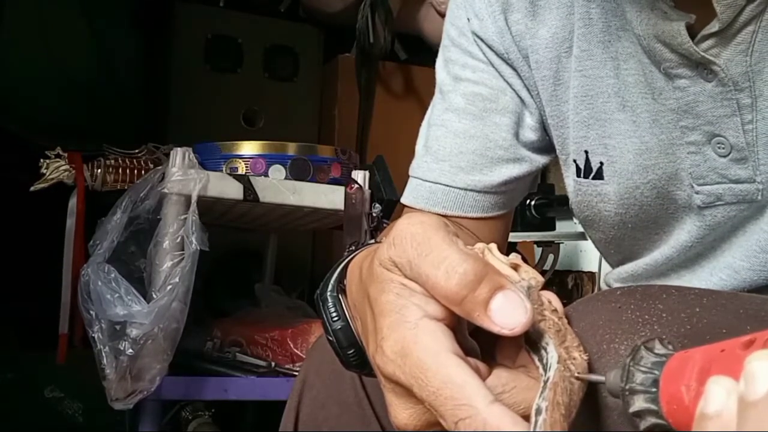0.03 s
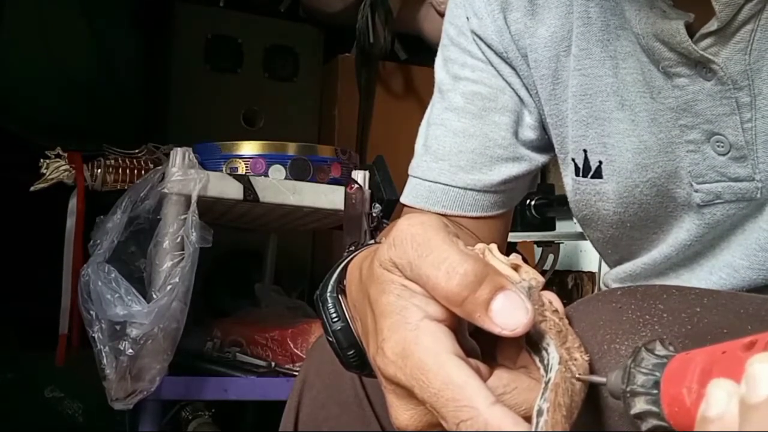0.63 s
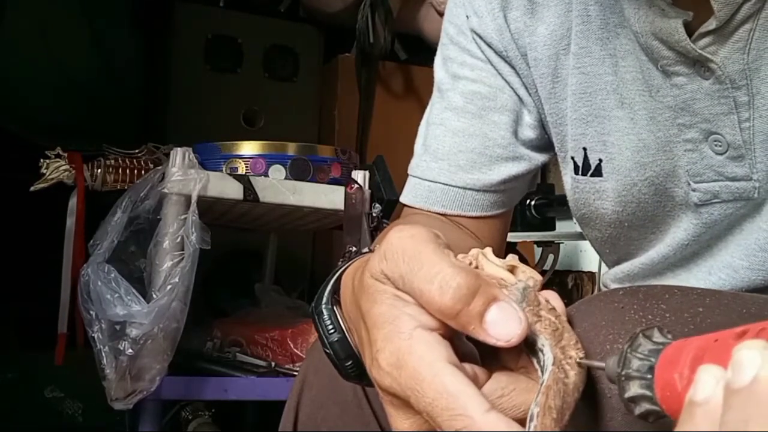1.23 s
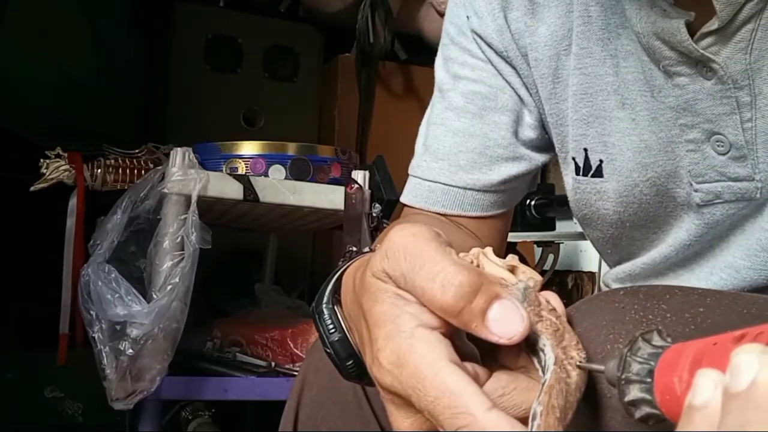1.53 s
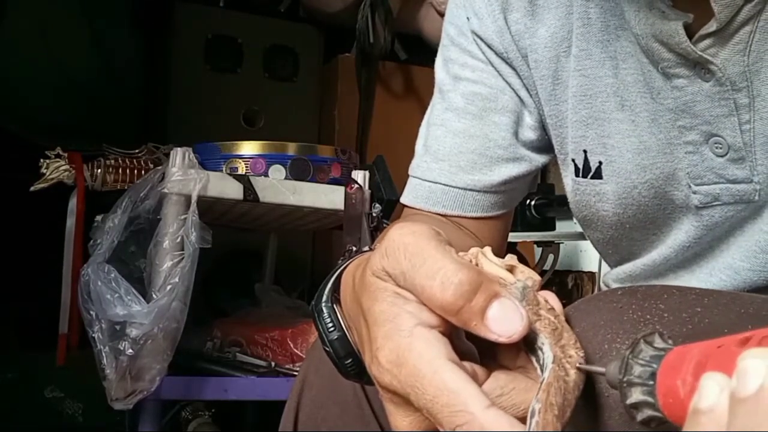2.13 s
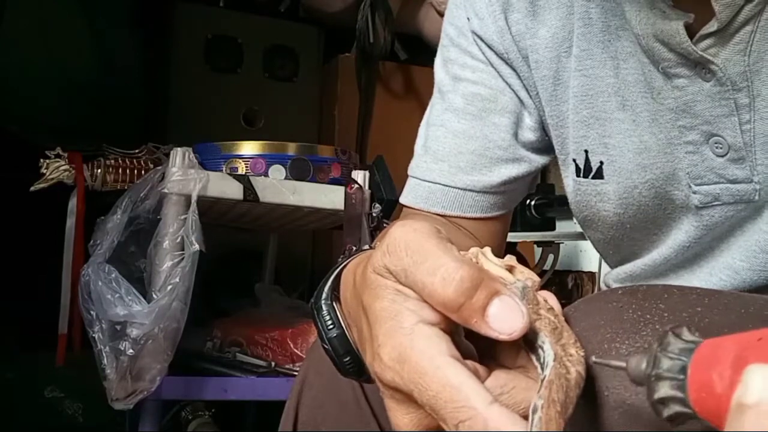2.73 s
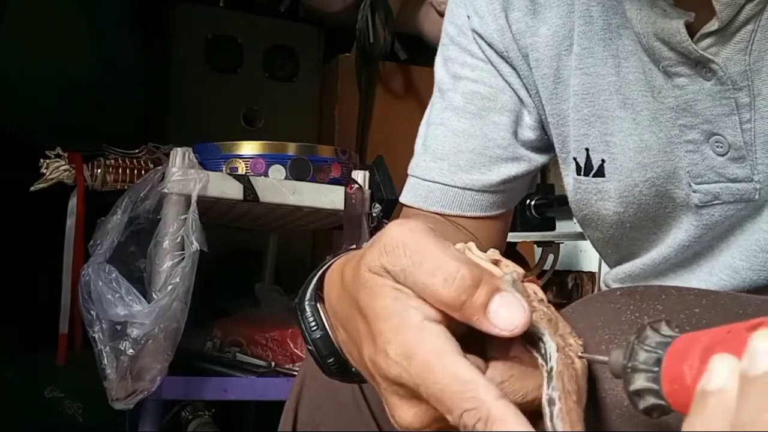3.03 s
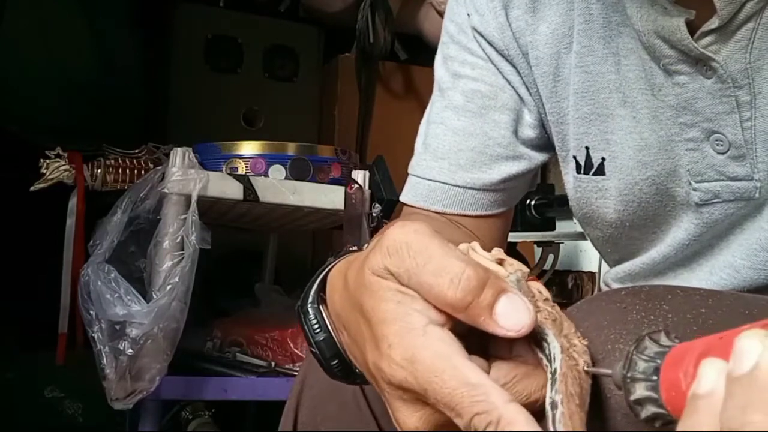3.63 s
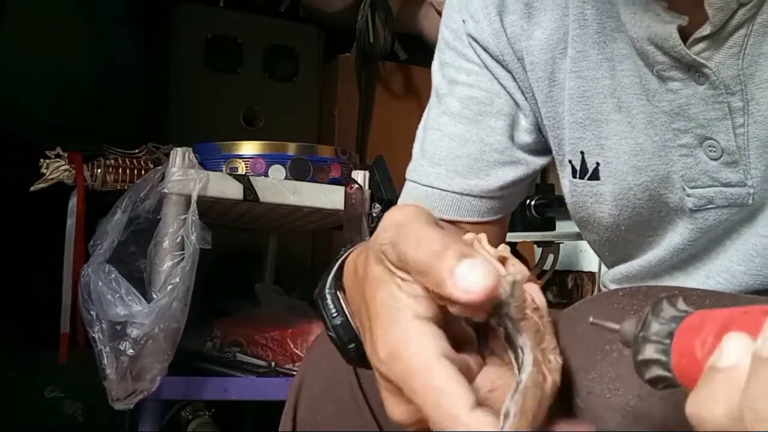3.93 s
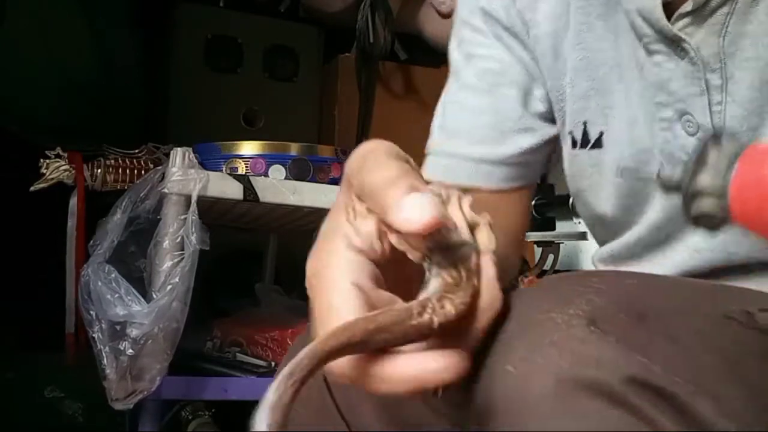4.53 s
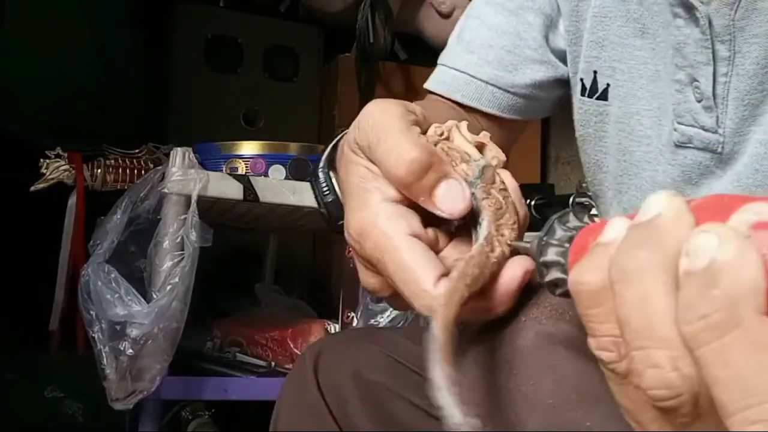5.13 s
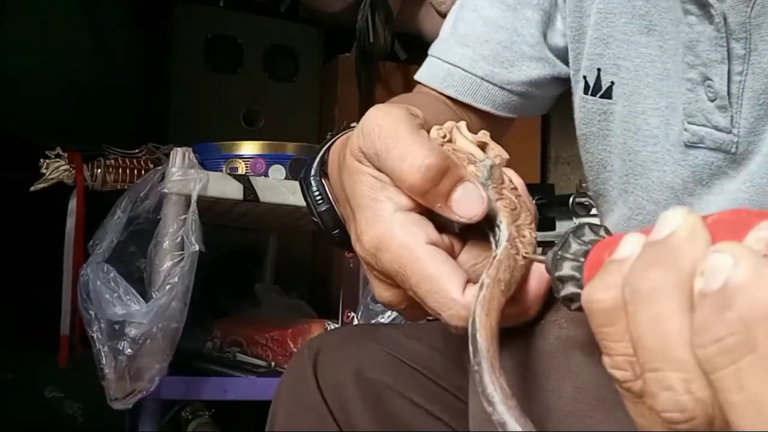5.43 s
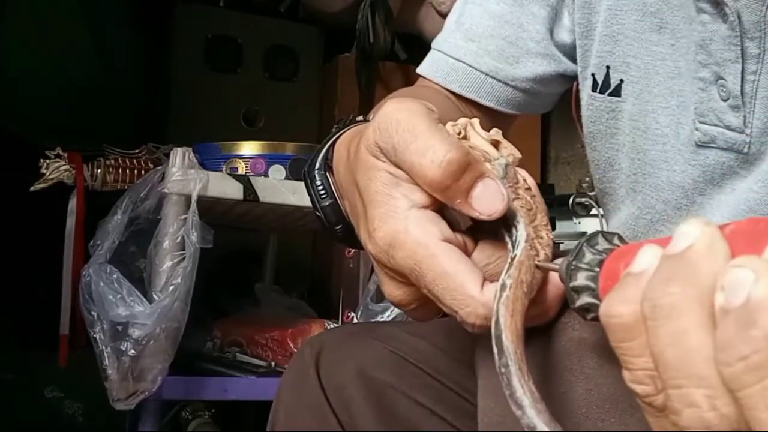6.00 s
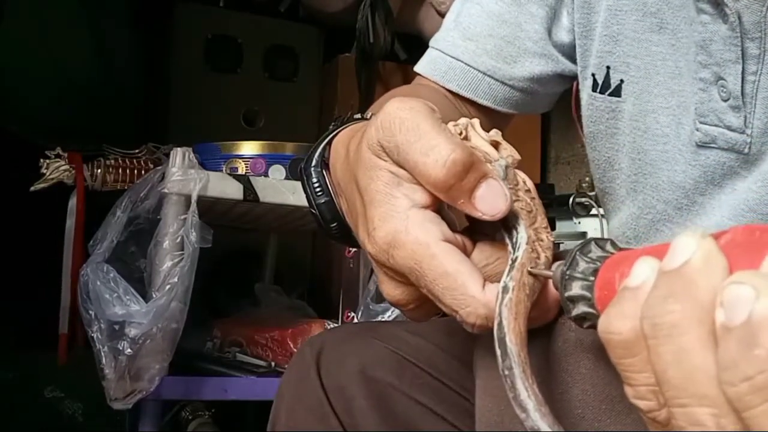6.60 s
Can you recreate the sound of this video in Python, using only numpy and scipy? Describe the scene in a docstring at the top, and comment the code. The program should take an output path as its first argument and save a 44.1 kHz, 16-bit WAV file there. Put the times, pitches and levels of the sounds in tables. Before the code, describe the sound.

A small electric rotary tool runs throughout, close by in a small room and louder on the left. It makes a high, slightly wavering whine with fan hiss and a fine electrical buzz. From the start to about 0.7 seconds its tip rasps into wood, with a few tiny squeaks. Further cuts come at about 1.2 to 1.6 and 1.9 to 2.4 seconds, each pulling the pitch down slightly, the latter with a faint growl. The tool then runs more freely and creeps up in pitch, with a high tone swelling near 3.4 seconds and a light scrape around 4. From 5.5 seconds a longer cut rasps on to the end, near 7 seconds, while the whine sinks and finishes with a brief squeak. Faint, dull bumps of hands on the wood occur in the first second and around 2.7, 4.7 and 5.7 seconds.

```python
"""In a small room, a little mains-powered rotary tool carves wood close by, louder at the left ear.
Its shaft turns about 320 times a second and whines on multiples of that speed; its fan hisses
through the vents. The speed control fires 100 times a second, which buzzes in the housing.
When the burr (the cutting tip) bites, the speed sags, the wood rasps and other multiples come forward.
Now and then the hands bump the wood, or a single tone swells into a squeak or a growl."""
import sys
import numpy as np
from scipy import signal
from scipy.fft import rfft, irfft
from scipy.io import wavfile
from scipy.ndimage import uniform_filter1d

SR = 44100
rng = np.random.default_rng(int(sys.argv[2]) if len(sys.argv) > 2 else 0)


def master_out(mix):
    """Clip the mix to full scale and print it as 16-bit PCM to the path in sys.argv[1]."""
    frames = np.transpose(np.atleast_2d(mix))
    ceiling = np.clip(frames, -1, 1)
    pcm = np.round(ceiling * 32767).astype(np.int16)
    wavfile.write(sys.argv[1], SR, pcm)


N = 302526
TIME = np.arange(N) / SR
FREQUENCIES = np.fft.rfftfreq(N, 1 / SR)
FIRING_HZ = 100.05  # how often the speed control lets current through
LEFT_DELAY_S = .00084  # the left ear hears the tool this much later
START_PHASES = rng.random((64, 8)) - .5  # where in its cycle each tone begins

# How fast the shaft turns: (time [s], speed [Hz])
SHAFT_SPEED = [(0.0, 314.7), (0.26, 316.0), (0.79, 317.3), (0.99, 321.5), (1.31, 323.1), (1.57, 317.2),
               (1.89, 319.0), (2.09, 321.0), (2.37, 313.7), (2.58, 318.4), (2.96, 322.3), (4.18, 327.0),
               (4.9, 328.3), (5.33, 326.8), (5.62, 327.5), (5.97, 320.6), (6.37, 316.4), (6.86, 307.9)]
# The burr presses into the wood: (start [s], end [s], time to bite [s], added load [1 = a full cut])
WOOD_CUTS = [(-0.1, 0.722, .05, 0.85), (1.232, 1.626, 0.065, 0.84), (1.948, 2.385, 0.089, 0.9),
             (2.424, 2.747, .05, .2), (3.675, 4.447, 0.34, .2), (5.45, 7, 0.23, 0.75)]
# Peaks and notches of housing and room: (frequency [Hz], width [Hz], gain [dB])
PEAKS_AND_NOTCHES = [(308.7, 6.6, -28), (617, 51, 8.5), (701.5, 12, 11), (859, 17, -5), (1079, 19, 6),
                     (2586, 79, -12.5), (2670, 140, 3), (4252, 41, 6), (5064, 79, 5), (5240, 50, 1.5),
                     (5895, 150, -8.5), (7450, 56, 8.5)]
# Tones of the whine: (shaft multiple, level running free [dB], level cutting [dB], right ear gain [dB])
WHINE_TONES = [(2, -65, -57, -6), (3, -57, -61, -5), (4, -59, -62, -8), (5, -57, -54, -10),
               (6, -68, -57, -10), (7, -64, -52, -13), (9, -52, -42, -17), (12, -55, -48, -17),
               (13, -51, -44, -17), (14, -56, -50, -13), (15, -62, -51, -12), (17, -56, -47, -16),
               (18, -46, -43, -19), (20, -48, -43, -21), (21, -41, -43, -21), (22, -51, -43, -23),
               (23, -48, -43, -24), (25, -55, -51, -17), (29, -55, -60, -7), (31, -57, -55, -6),
               (32, -60, -55, -3), (46, -56, -49, -11), (47, -53, -55, -9)]
# Strong tones that beam one way: (shaft multiple, level running free [dB], level cutting [dB],
# change once the tool is tilted [dB], right ear gain [dB])
BEAMED_TONES = [(1, -58, -58, -1, -12), (8, -47, -40, 0, -8), (11, -44, -42, -2, -14),
                (16, -40, -39, -5, -17), (19, -35, -37, -2, -25), (24, -44, -42, 2, -26)]
# Side tones, whole steps of the firing rate away from a multiple:
# (shaft multiple, steps, level running free [dB], level cutting [dB], right ear gain [dB])
SIDE_TONES = [(1, 1, -65, -72, -13), (1, 2, -62, -65, -8), (2, 1, -62, -61, -6), (2, 2, -57, -52, -8),
              (3, -1, -61, -55, -5), (3, 1, -58, -63, -6), (3, 2, -64, -72, -2), (4, -1, -70, -65, -8),
              (4, 1, -59, -60, -12), (8, -2, -55, -55, -19), (8, -1, -50, -46, -18), (8, 1, -45, -45, -20),
              (8, 2, -46, -47, -18), (8, 3, -46, -44, -16), (8, 4, -48, -53, -17), (8, 5, -52, -51, -20),
              (16, 1, -49, -53, -19)]
# The buzz fades for a moment: (middle [s], length [s], depth [dB])
BUZZ_DIPS = [(0.2, 0.38, 9), (0.81, 0.71, 6), (1.734, 0.42, 4.5), (4.536, 0.81, 11)]
# How alike noise is at the two ears: (frequency [Hz], likeness [0 to 1])
EAR_LIKENESS = [(60, 1), (300, 0.6), (700, 0.58), (1300, 0.32), (2500, 0.087), (6000, 0.1), (15000, 0.12)]
# Rush of the fan: (frequency [Hz], left level [dB per Hz], right level [dB per Hz])
FAN_SPECTRUM = [(25, -113, -113), (130, -92.5, -94.5), (230, -100, -100.5), (450, -92, -99),
                (880, -87, -83), (2330, -80.5, -93.5), (2980, -71, -81.5), (3260, -70.5, -86),
                (4560, -70.5, -78), (6000, -71, -81.5), (8240, -72.5, -89), (9460, -77, -77),
                (10530, -77, -75.5), (11800, -78.5, -80), (13100, -94, -81)]
# The motor's hollow body: (frequency [Hz], left level [dB per Hz], right level [dB per Hz])
BODY_SPECTRUM = [(200, -110, -112), (320, -85.5, -105), (463, -89.5, -109), (560, -79, -82),
                 (850, -83.5, -92.5), (1070, -78, -92.5), (1370, -79, -90), (1660, -77.5, -97),
                 (2220, -105, -102), (4000, -115, -120)]
# The hollow sound rises and falls: (time [s], gain [dB])
BODY_GAIN = [(0, -1.5), (.5, 0.5), (.85, -2), (1.4, 1.5), (1.75, -1), (2.6, 0.5), (3.6, 0), (4.2, 4.5),
             (4.65, -2.5), (6, -0.5), (6.6, -5)]
# Tone color of air in the vent slots: (frequency [Hz], left gain [dB], right gain [dB])
VENT_SPECTRUM = [(2000, -68, -79), (4400, -31, -65), (5400, -6.5, -39), (6520, 5, -10), (7030, 2.5, -20),
                 (7780, -3, -32), (8210, -13, -40), (9600, -47, -52)]
# Loudness of the vent hiss: (time [s], level [dB])
VENT_LOUDNESS = [(0, -33.5), (.8, -34.5), (1.2, -32), (2.1, -33), (2.75, -36), (2.95, -32), (3.55, -31),
                 (3.8, -34), (4.55, -35.5), (4.9, -31.5), (6, -31), (6.86, -32)]
# Tone color of a thin, very high fizz: (frequency [Hz], left gain [dB], right gain [dB])
FIZZ_SPECTRUM = [(9000, -65, -65), (13000, -35, -40), (13800, -7, -13), (14800, -1.5, -18), (15160, 6, -20),
                 (16000, -14, -12)]
# Loudness of the fizz: (time [s], level [dB])
FIZZ_LOUDNESS = [(0, -40), (2.2, -39.5), (2.6, -36.5), (2.9, -40), (4.5, -40), (4.9, -43.5), (6.86, -42.5)]
# The burr in the wood: (frequency [Hz], left level [dB per Hz], right level [dB per Hz])
RASP_SPECTRUM = [(60, -108, -110), (148, -100, -101), (440, -103, -100), (750, -74.5, -91),
                 (1110, -86, -85), (1350, -76.5, -85), (1720, -80, -86), (2400, -72, -90), (3350, -73, -87),
                 (5400, -79.5, -88), (7470, -72, -81), (8900, -100, -100), (13000, -104, -99)]
# Pitches at which the housing rings: (frequency [Hz], width [Hz], gain [dB])
HOUSING_RINGS = [(1140, 260, -8), (1380, 73, 11), (1630, 200, -6), (2670, 260, 9), (3000, 180, 20.5),
                 (4300, 760, -55)]
# The hands bump the wood: (time [s], level [dB])
HAND_BUMPS = [(0.12, -56), (0.539, -53), (0.8, -52), (1.45, -63), (2.669, -58), (4.67, -56), (5.72, -56),
              (6.82, -76)]
# One tone swells: (middle [s], length [s], shaft multiple, steps of the firing rate, level [dB])
TONE_SWELLS = [(0.285, .045, 17, 0, -40), (0.487, .05, 9, 0, -36), (0.52, .42, 2, 2, -52),
               (0.607, .05, 9, 0, -36), (1.35, .05, 9, 0, -40), (2.17, .35, 2, 2, -51),
               (2.23, .2, 8, 0, -39), (2.3, .2, 2, 1, -52), (3.37, .35, 19, 0, -39), (4.56, .4, 8, 0, -46),
               (6.7, .5, 2, 1, -56), (6.83, .25, 24, 0, -37)]


def gain_of(db):
    """Turns decibels into a number to multiply a sound by."""
    return 10 ** (np.asarray(db) / 20)


def normalize(x):
    """Scales a signal so that its typical size (rms) is 1."""
    return x / np.sqrt(np.mean(x ** 2) + 1e-20)


def over_time(table):
    """Joins the points of a time table with straight lines."""
    times, values = np.transpose(table)
    return np.interp(TIME, times, values)


def over_frequency(table):
    """Joins the points of a frequency table, one curve for each value column."""
    hz, *columns = np.transpose(table)
    return np.array([np.interp(np.log(FREQUENCIES + 1), np.log(hz), column) for column in columns])


def wander(rate_hz):
    """A random wobble of typical size 1 that changes about rate_hz times a second."""
    points = rng.standard_normal(4096)
    return normalize(np.interp(TIME * rate_hz, np.arange(len(points)), points))


def burr_load(idle_load=0.064, release_s=0.067):
    """How hard the burr works: each cut bites, holds and lets go."""
    load = idle_load
    for start, end, bite_s, added_load in WOOD_CUTS:
        biting = (TIME - start) / bite_s
        letting_go = (end - TIME) / release_s + .5
        load = load + added_load * np.clip(np.minimum(biting, letting_go), 0, 1)
    return load


def resonance_db(cycles, stride=128):
    """A tone swells and fades as its pitch slides through the peaks and notches of housing and room."""
    hz = np.gradient(cycles[::stride], TIME[::stride])
    gain_db = sum(db / (1 + (2 * (hz - center) / width) ** 2) for center, width, db in PEAKS_AND_NOTCHES)
    return np.interp(TIME, TIME[::stride], gain_db)


def motor_tone(turns, multiple, level_db, right_db, waver_db, roughness, step=0, scatter=0):
    """One tone, wavering as the hands move. With no scatter, side tones line up at each firing."""
    firings = TIME * FIRING_HZ - .62
    phase = START_PHASES[multiple, 0] + scatter * (step != 0) * START_PHASES[multiple, step]
    cycles = multiple * turns + step * firings + phase
    average_hz = multiple * turns[-1] / TIME[-1] + step * FIRING_HZ
    left = np.cos(2 * np.pi * (cycles - average_hz * LEFT_DELAY_S))
    left *= gain_of(level_db + waver_db * np.tanh(wander(rate_hz=7)))
    right = np.cos(2 * np.pi * cycles)
    right *= gain_of(level_db + right_db + waver_db * np.tanh(wander(rate_hz=5.9)))
    flutter = 1 + roughness * wander(rate_hz=90)
    return np.sqrt(2) * flutter * gain_of(resonance_db(cycles)) * np.array([left, right])


def whine(turns, load, tilt):
    """Rotor, fan blades and burr teeth sing on multiples of the shaft speed, rougher when cutting."""
    bite = np.clip(load, 0, 1)
    roughness = 0.12 + 0.14 * bite
    out = 0
    for multiple, free_db, cutting_db, right_db in WHINE_TONES:
        level_db = free_db + bite * (cutting_db - free_db) + 0.9 - 0.5 * load
        out += motor_tone(turns, multiple, level_db, right_db, waver_db=3, roughness=roughness)
    for multiple, free_db, cutting_db, tilt_db, right_db in BEAMED_TONES:
        level_db = free_db + bite * (cutting_db - free_db) + tilt * tilt_db - 0.18
        out += motor_tone(turns, multiple, level_db, right_db, waver_db=1.3, roughness=roughness)
    return out


def hump(middle_s, length_s):
    """A rounded rise from 0 to 1 and back."""
    return np.cos(np.pi * np.clip((TIME - middle_s) / length_s, -.5, .5))


def buzz(turns, load, buzz_db):
    """The chopped current adds side tones that pulse together; cutting throws them out of step."""
    bite = np.clip(load, 0, 1)
    out = 0
    for multiple, step, free_db, cutting_db, right_db in SIDE_TONES:
        extra_db = buzz_db + 0.36 if multiple > 4 else 0.2
        level_db = free_db + bite * (cutting_db - free_db) + extra_db
        out += motor_tone(turns, multiple, level_db, right_db, waver_db=1.6, roughness=0.12,
                          step=step, scatter=.08 + .9 * bite)
    return out


def current_surges(decay_s):
    """The current jumps at every firing of the speed control and dies away before the next."""
    age_s = (TIME * FIRING_HZ - .6) % 1 / FIRING_HZ
    return age_s / decay_s * np.exp(1 - age_s / decay_s)


def hiss(spectrum, flutter):
    """Noise at both ears: flutter shakes its loudness and the spectrum table sets its tone color."""
    shared, separate = rfft(rng.standard_normal((2, N)) * normalize(flutter))
    likeness = over_frequency(EAR_LIKENESS)[0]
    left = shared * np.exp(-2j * np.pi * FREQUENCIES * LEFT_DELAY_S)
    right = likeness * shared + np.sqrt(1 - likeness ** 2) * separate
    return irfft(np.array([left, right]) * gain_of(over_frequency(spectrum)), N) * np.sqrt(SR / 2)


def fan_air(turns, body_db):
    """Fan, hollow body and vents pulse with the current, the vents also with each turn; fizz on top."""
    surge = current_surges(decay_s=0.00088)
    rush = hiss(FAN_SPECTRUM, 1 + 0.2 * surge + 0.071 * wander(rate_hz=790))
    body = hiss(BODY_SPECTRUM, 1 + 1.34 * surge + 0.072 * wander(rate_hz=190)) * gain_of(body_db)
    vent_flutter_db = 2.7 * surge + 3.1 * np.cos(2 * np.pi * turns) + wander(rate_hz=690)
    vent = normalize(hiss(VENT_SPECTRUM, gain_of(vent_flutter_db)))
    vent *= gain_of(over_time(VENT_LOUDNESS))
    fizz = normalize(hiss(FIZZ_SPECTRUM, gain_of(0.89 * wander(rate_hz=350))))
    fizz *= gain_of(over_time(FIZZ_LOUDNESS))
    return rush + body + vent + fizz


def wood_rasp(turns, load):
    """The burr tears wood fibers once a turn, unevenly, and louder under load."""
    tearing_db = 1.9 * np.cos(2 * np.pi * turns) + 1.5 * wander(rate_hz=300)
    return hiss(RASP_SPECTRUM, gain_of(tearing_db)) * load ** 0.53


def brush_sparks(load, buzz_db, body_db, level_db=-41.5, right_db=-10, steadying_db=5):
    """The motor's brushes spark at each surge and tick in the housing; pressing down steadies them."""
    kicks = current_surges(decay_s=0.00014) * rng.standard_normal(N)
    t = np.arange(2048) / SR
    ringing = 0
    for hz, width, db in HOUSING_RINGS:
        ring = width * np.exp(-np.pi * width * t) * np.cos(2 * np.pi * hz * t)
        ring_db = db + (buzz_db if hz > 2000 else body_db)
        ringing += signal.fftconvolve(kicks, ring)[:N] * gain_of(ring_db)
    left = normalize(ringing) * gain_of(level_db - steadying_db * load)
    right = gain_of(right_db) * np.roll(left, -round(LEFT_DELAY_S * SR))
    return np.array([left, right])


def drifting_echoes(sound, depth_db=1.5):
    """Echoes off hands and lap lift some frequencies and lower others, drifting as the tool moves."""
    slices = signal.stft(sound, nperseg=1024, noverlap=768)[2]
    ripples = uniform_filter1d(rng.standard_normal(slices.shape), size=3, axis=1)  # smooth in frequency
    ripples = uniform_filter1d(ripples, size=70, axis=2)  # smooth in time
    slices *= normalize(gain_of(depth_db * normalize(ripples)))
    return signal.istft(slices, nperseg=1024, noverlap=768)[1][:, :N]


def hand_bumps(band_hz=(78, 180), rise_s=.016, gain_db=-1):
    """The hands knock softly on the wood: short, dull swells of low noise."""
    t = np.arange(SR // 4) / SR
    swell = t / rise_s * np.exp(-t / rise_s)
    dull_filter = signal.butter(4, band_hz, "band", fs=SR, output="sos")
    out = np.zeros(N + SR)
    for start_s, db in HAND_BUMPS:
        knock = signal.sosfilt(dull_filter, rng.standard_normal(len(t))) * swell
        out[round(start_s * SR):][:len(t)] += gain_of(db + gain_db) * knock / abs(knock).max()
    return out[:N]


def squeaks(turns):
    """Single tones swell, mostly where the burr catches: high ones squeak, low ones growl in the wood."""
    out = 0
    for middle_s, length_s, multiple, step, db in TONE_SWELLS:
        tone = motor_tone(turns, multiple, db, right_db=-6, waver_db=1, roughness=0.14,
                          step=step, scatter=1)
        out += hump(middle_s, length_s) * tone
    return out


def scene(tilt_at_s=3.9, tilt_takes_s=1):
    """The tool carves; partway through it is tilted, which changes the tones that beam at the listener."""
    load = burr_load()
    tilt = np.clip((TIME - tilt_at_s) / tilt_takes_s, 0, 1)
    tremble = (0.00045 + 0.00035 * load) * wander(rate_hz=45)
    turns = np.cumsum(over_time(SHAFT_SPEED) * (1 + tremble)) / SR  # shaft turns so far
    dips_db = sum(depth * hump(middle_s, length_s) ** 2 for middle_s, length_s, depth in BUZZ_DIPS)
    buzz_db = -0.55 + 1.5 * tilt - dips_db
    body_db = over_time(BODY_GAIN)
    tones = whine(turns, load, tilt) + buzz(turns, load, buzz_db) + squeaks(turns)
    noises = fan_air(turns, body_db) + wood_rasp(turns, load) + brush_sparks(load, buzz_db, body_db)
    return tones + drifting_echoes(noises) + hand_bumps()


def record(dry, cutoff_hz=15600):
    """A steep filter takes away the very highest treble."""
    low_pass = signal.firwin(511, cutoff_hz, window=("kaiser", 9), fs=SR)
    return signal.oaconvolve(dry, low_pass[None], "same")


dry = scene()
out = record(dry)
master_out(out)
```